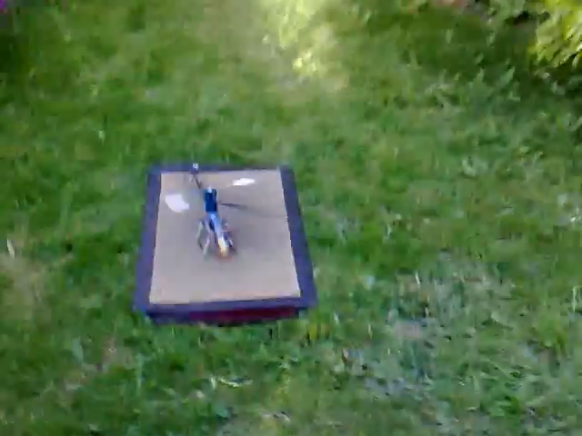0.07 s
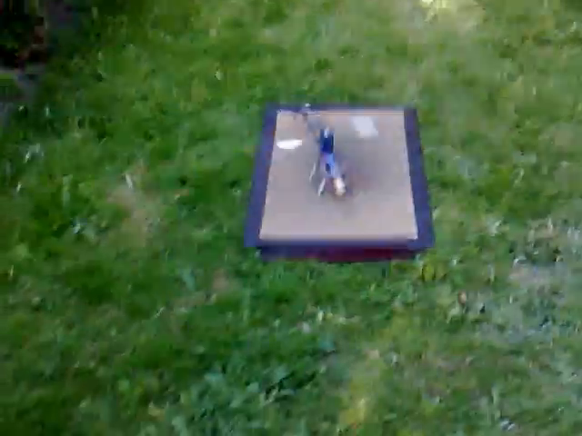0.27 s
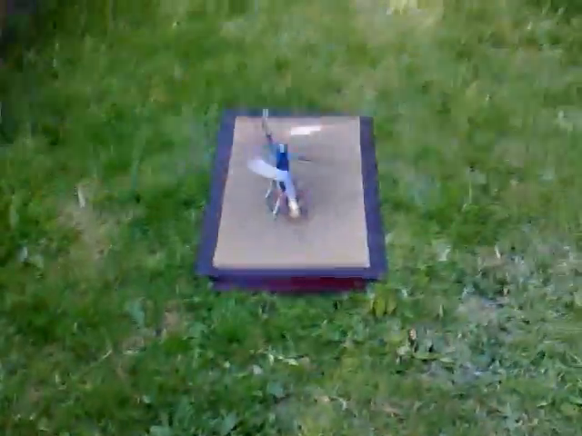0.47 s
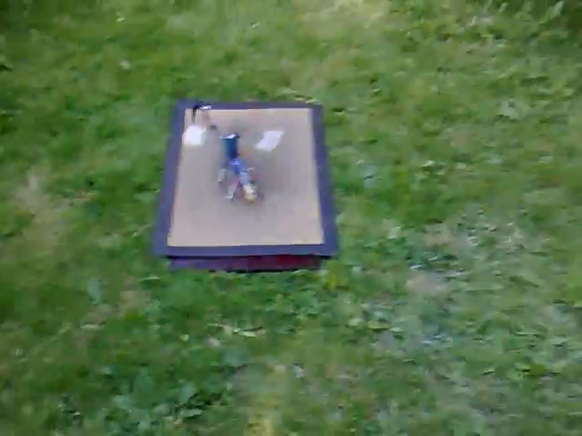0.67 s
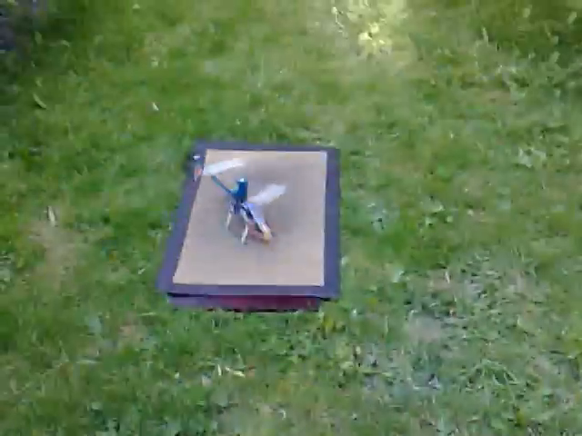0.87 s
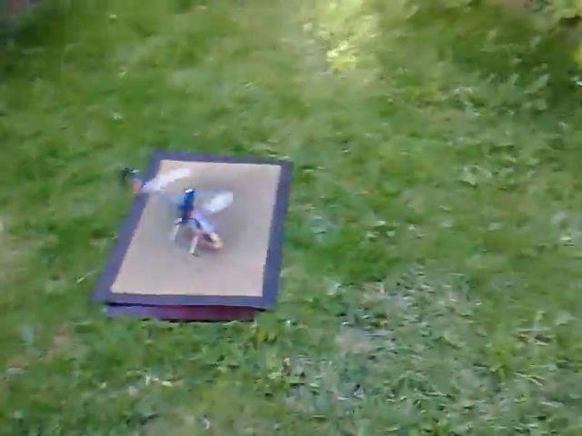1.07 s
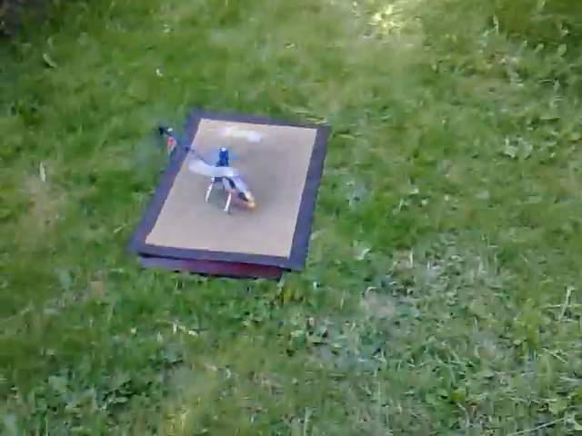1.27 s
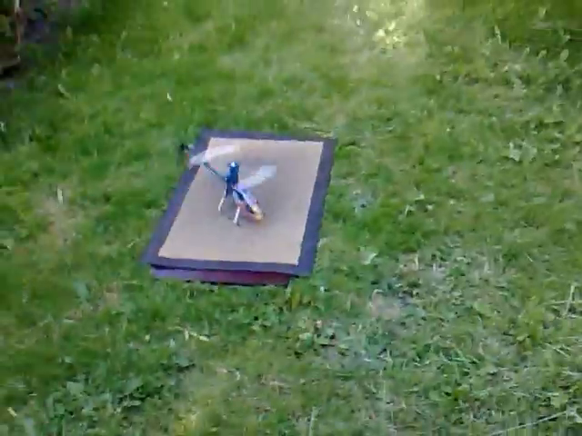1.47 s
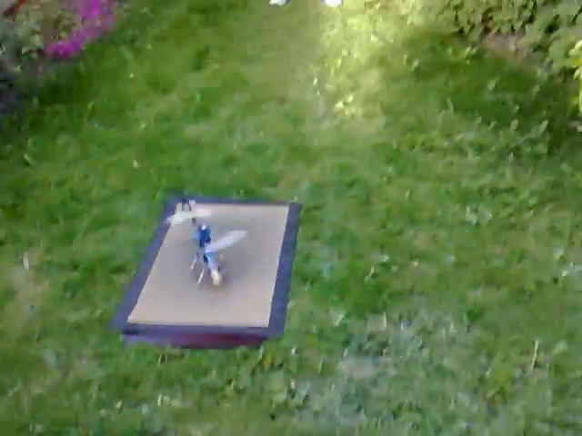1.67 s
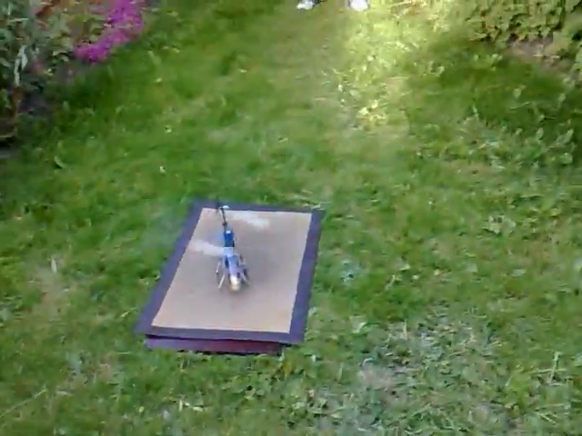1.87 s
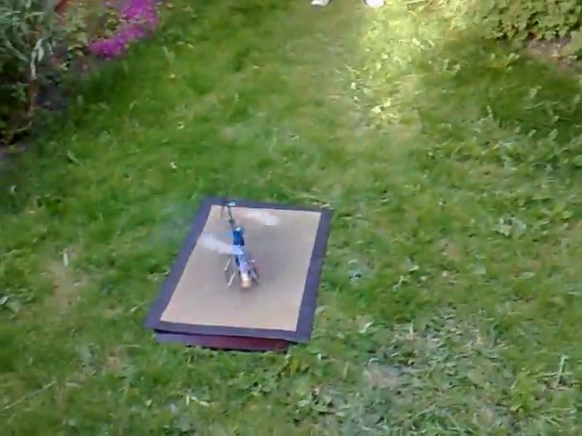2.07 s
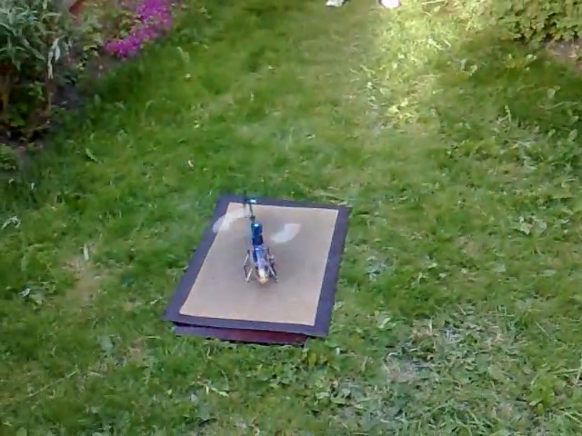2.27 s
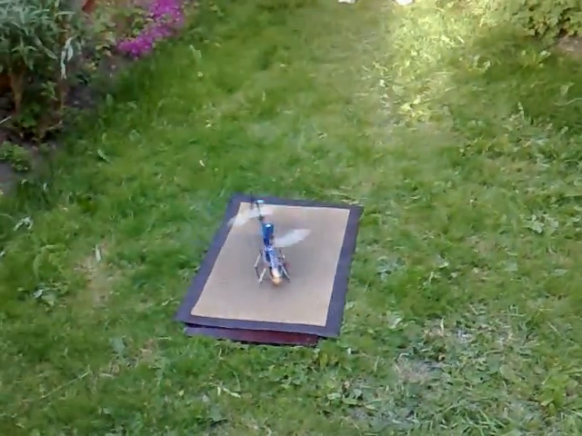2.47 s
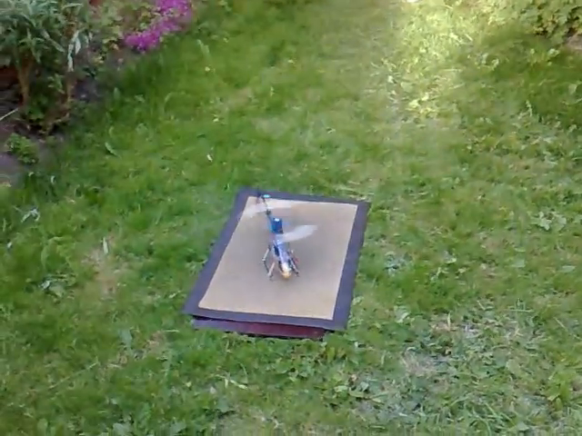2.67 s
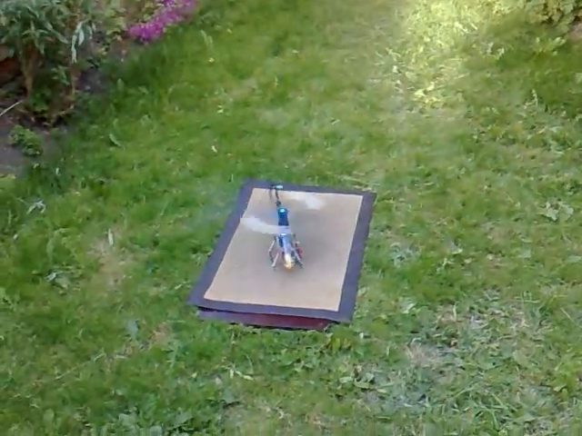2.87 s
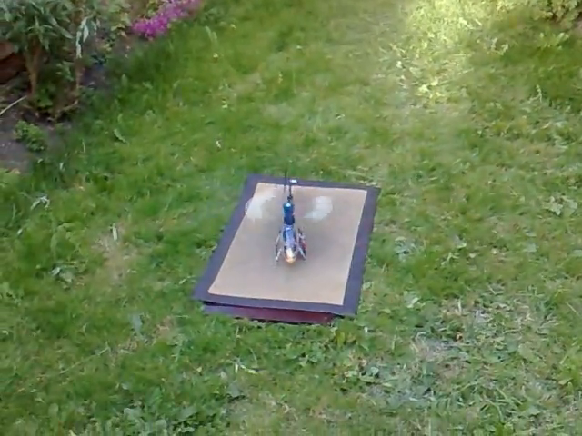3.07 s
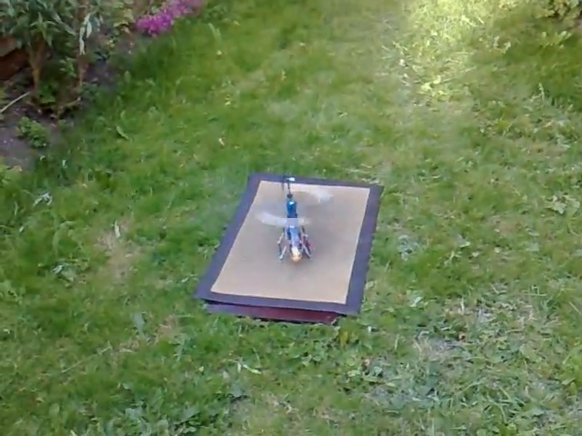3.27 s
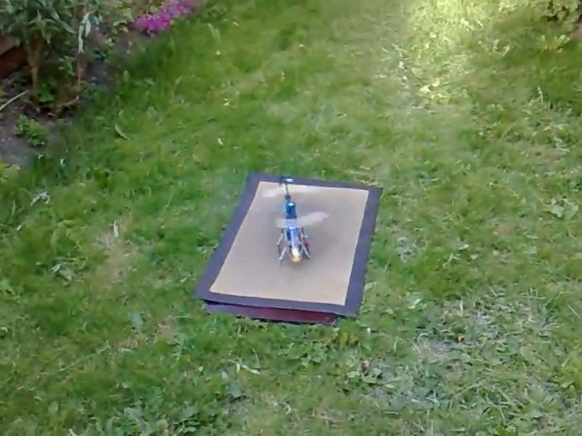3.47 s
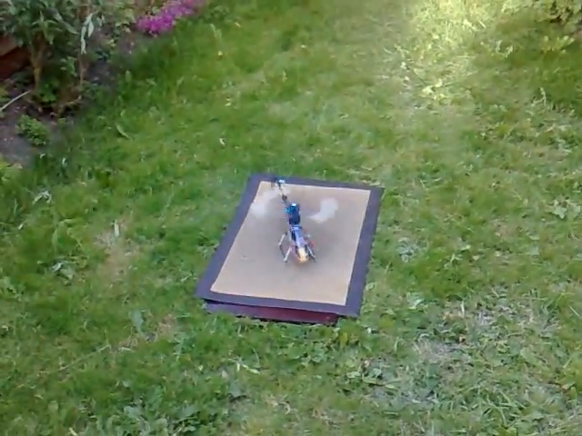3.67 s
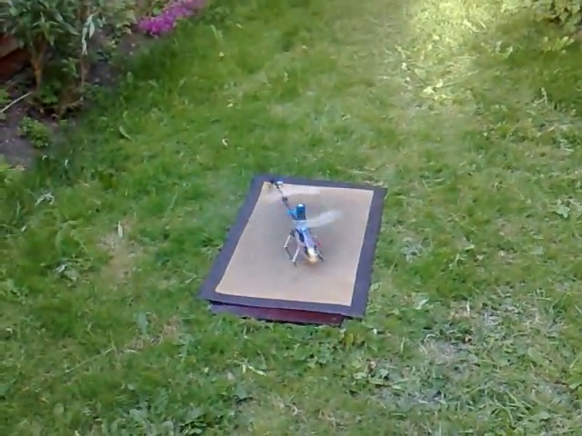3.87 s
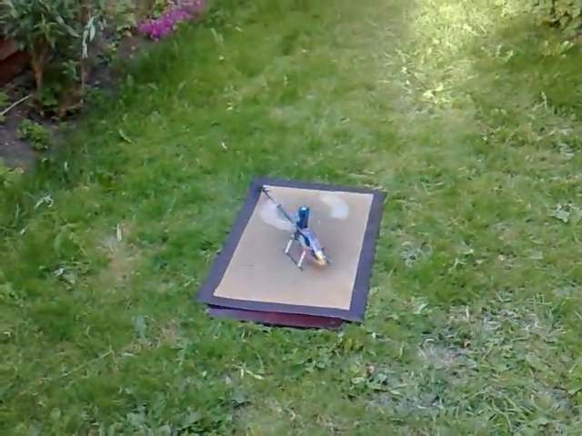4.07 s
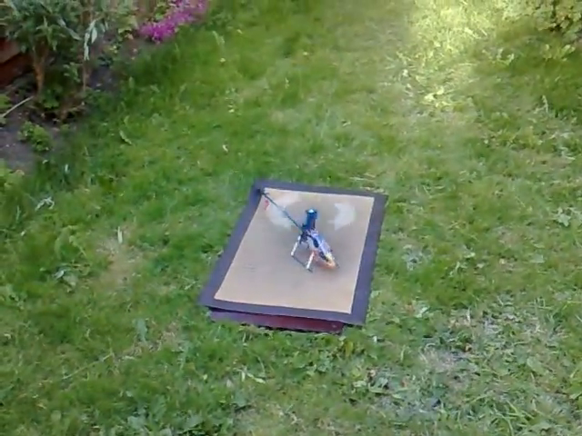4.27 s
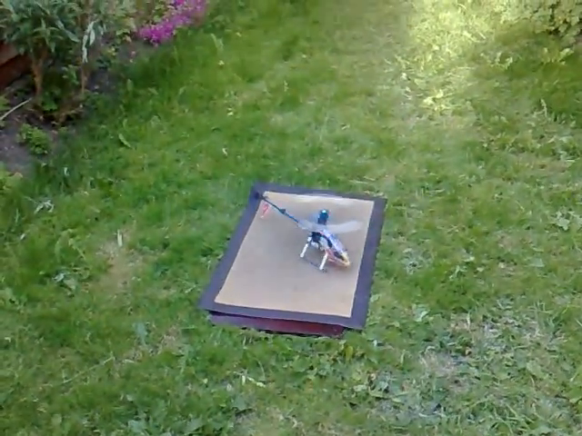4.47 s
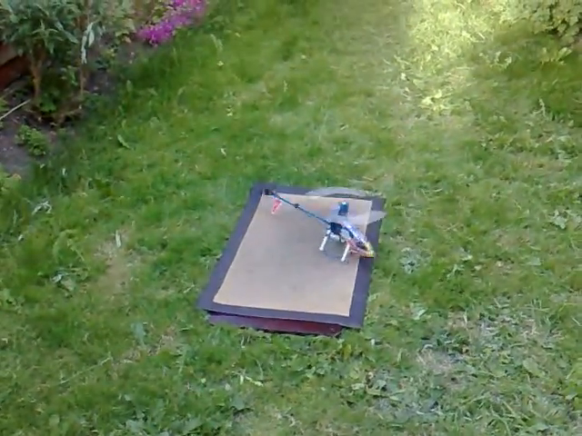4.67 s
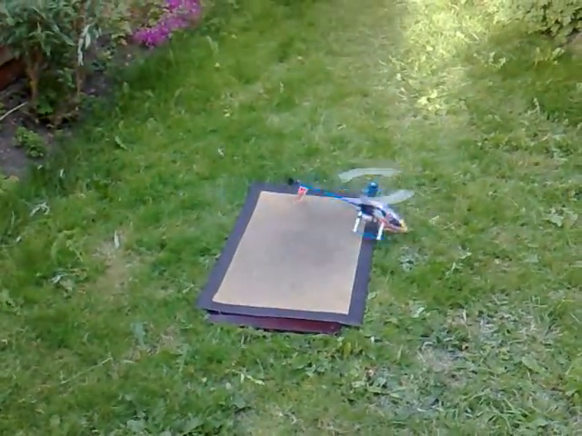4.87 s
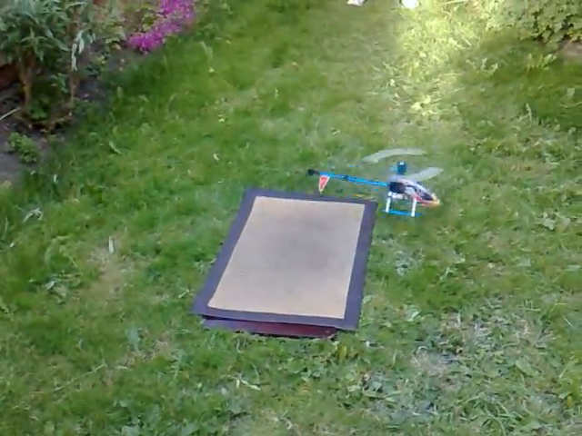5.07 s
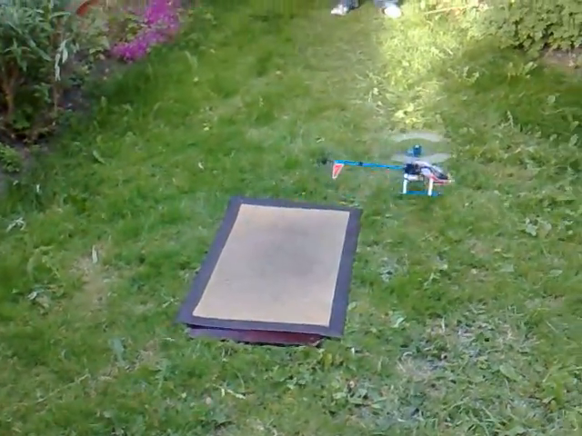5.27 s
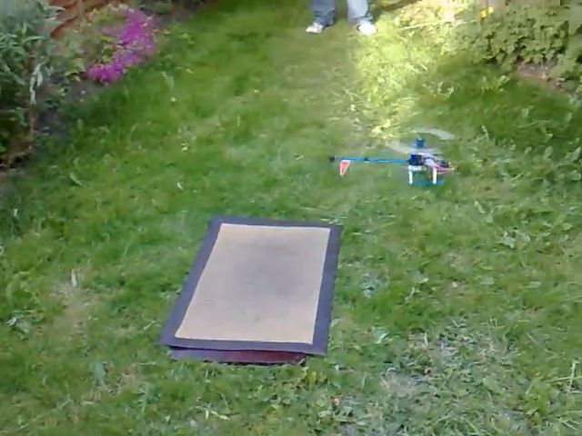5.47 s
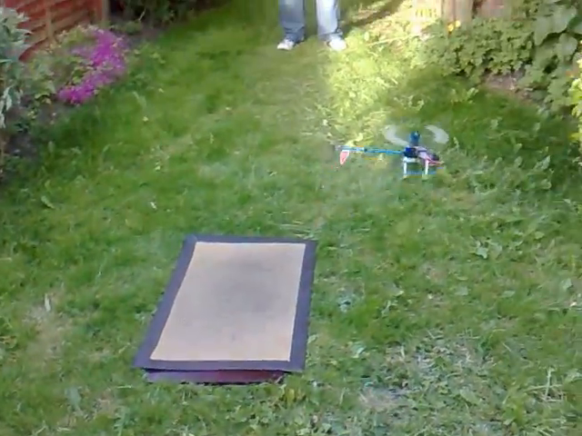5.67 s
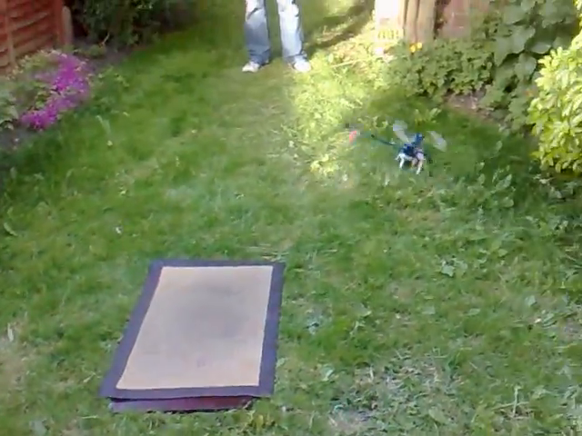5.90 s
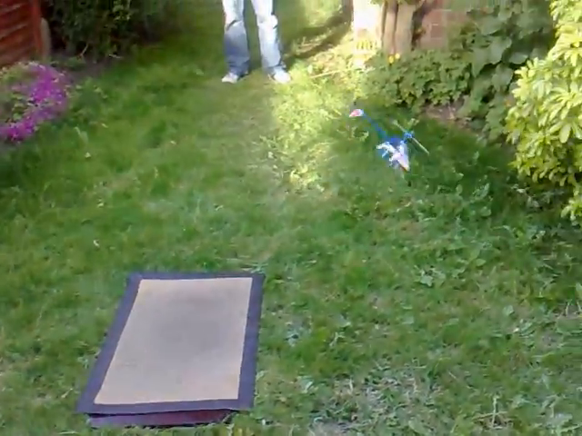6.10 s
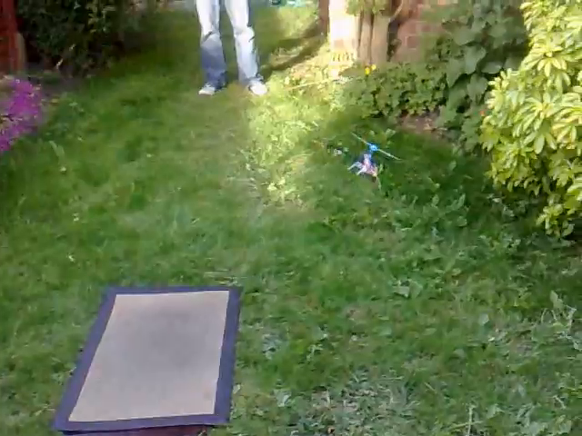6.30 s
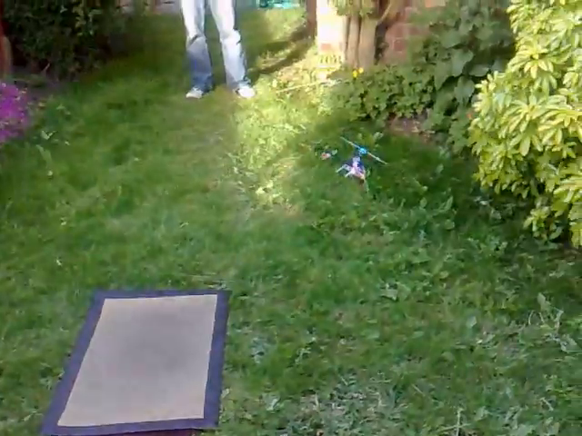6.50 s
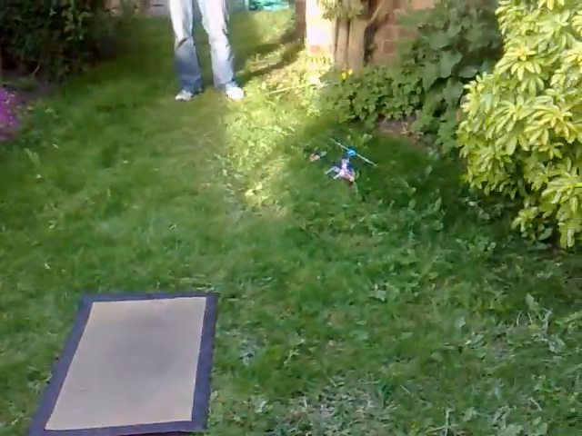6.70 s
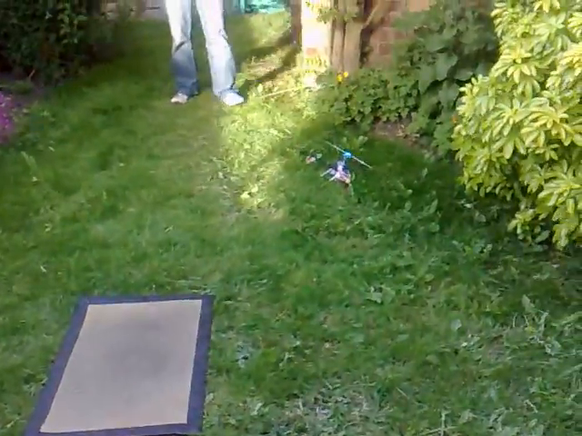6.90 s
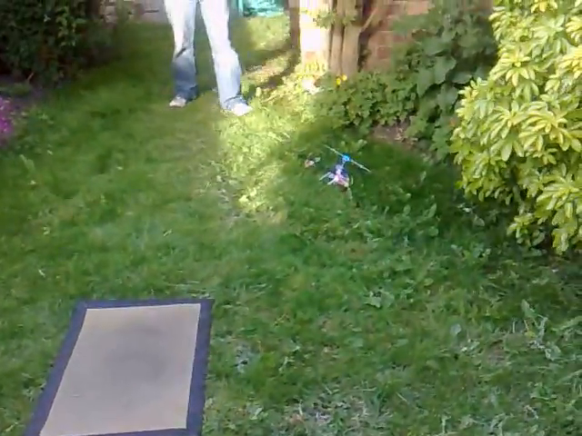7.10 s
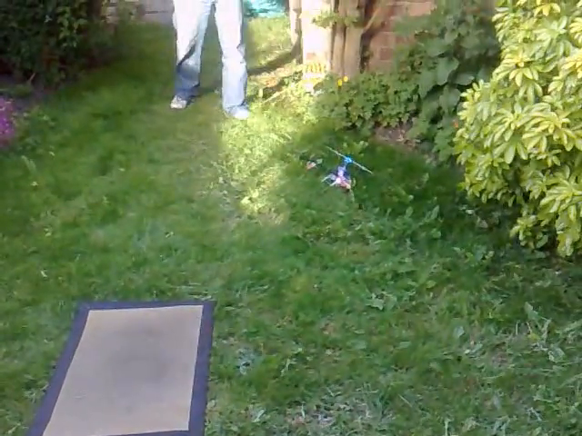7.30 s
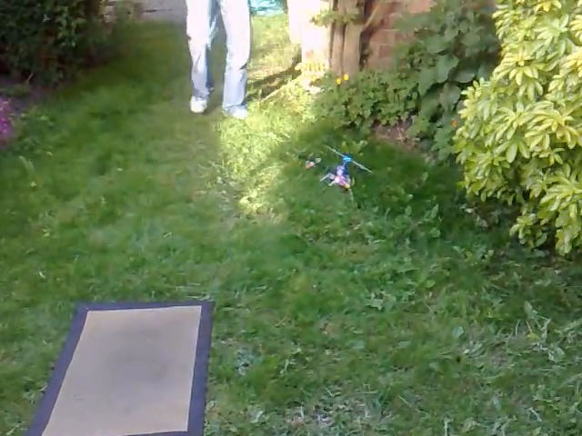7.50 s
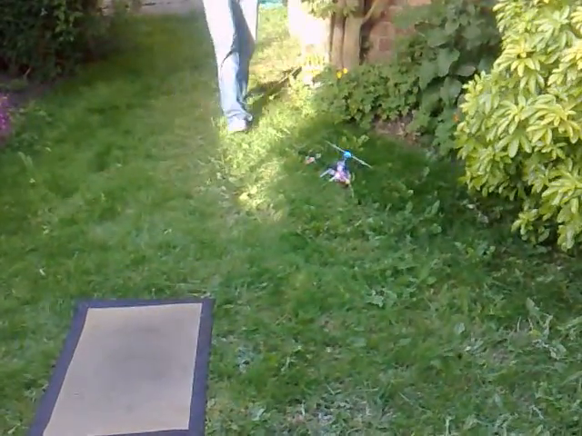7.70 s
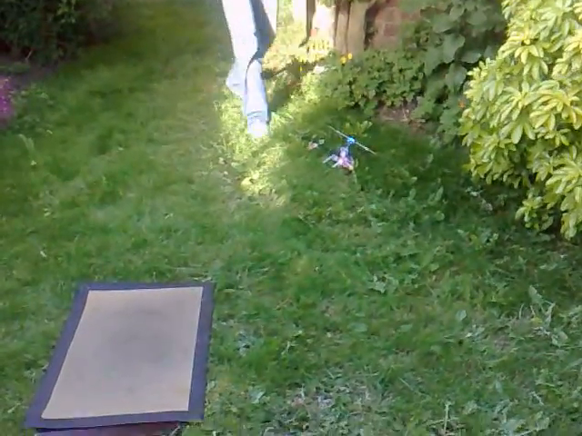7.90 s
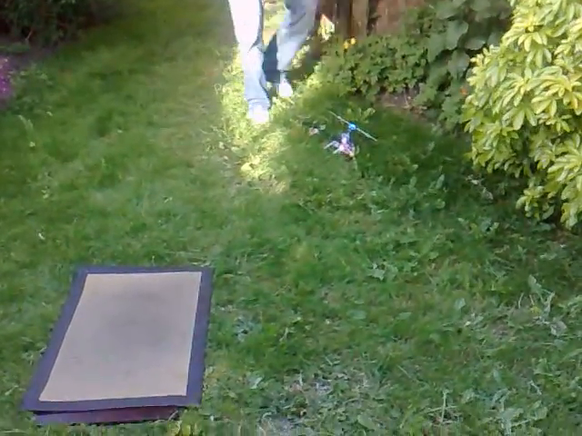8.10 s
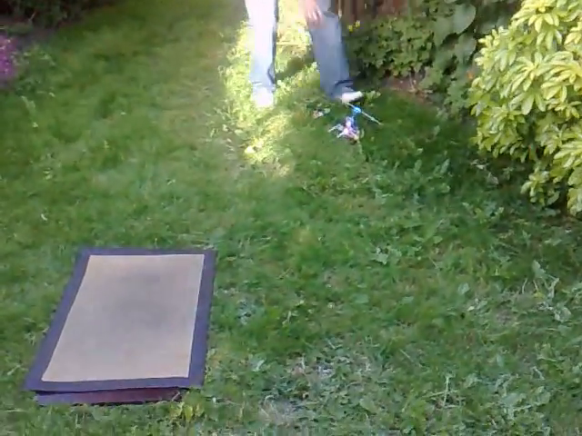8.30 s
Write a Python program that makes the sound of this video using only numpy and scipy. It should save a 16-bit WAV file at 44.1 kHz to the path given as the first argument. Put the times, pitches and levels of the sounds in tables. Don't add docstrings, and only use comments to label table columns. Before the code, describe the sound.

In a garden, a small electric helicopter spins up on a mat, its thin gear whine climbing over airy blade wash and hiss. Skids buzz, the hand-held microphone ticks and wind thumps it heavily. The pitch rises again at lift-off and moves away slightly; then the blades rattle through grass in a burst of sharp cracks and stop. Faint traffic, leaves and footsteps remain.

```python
import sys
import numpy as np
from scipy import signal
from scipy.fft import irfft, next_fast_len
from scipy.io import wavfile
from scipy.ndimage import uniform_filter1d

SR = 44100
rng = np.random.default_rng(int(sys.argv[2]) if len(sys.argv) > 2 else 0)


def rack_gain(trim_db):
    fader = np.asarray(trim_db, float)
    return 10 ** (fader / 20)


def dump_mix(stems):
    frames = np.atleast_2d(stems).T
    limited = np.clip(frames, -1, 1)
    pcm = np.round(limited * 32767).astype(np.int16)
    wavfile.write(sys.argv[1], SR, pcm)


N = 368097


def evened(x):
    return x / np.sqrt(np.mean(x ** 2) + 1e-20)


def read(shape, hz):
    f, db = np.transpose(shape)
    return np.interp(np.log(hz + 1), np.log(f), db, left=-80, right=-80)


def curves(rows):
    s, *columns = np.vstack(rows).T
    t = np.arange(N) / SR
    gate = np.interp(t, [s[0] - .02, s[0], s[-1], s[-1] + .02], [0, 1, 1, 0])
    return [gate] + [np.interp(t, s, c) for c in columns]


def bursts(rows, rise_db, fall_db):
    t = np.arange(N) / SR
    power = 0
    for s, length, db in rows:
        early_s, late_s = np.maximum(s - t, 0), np.maximum(t - s - length, 0)
        power = power + rack_gain(db - rise_db * early_s - fall_db * late_s) ** 2
    return np.sqrt(power)


def add(mix, s, sound):
    part = mix[round(s * SR):][:len(sound)]
    part += sound[:len(part)]


def resonate(x, hz, width):
    turn = np.exp(2j * np.pi * np.cumsum(hz * np.ones(len(x))) / SR)
    r = np.exp(-np.pi * width / SR)
    return 2 * (turn * signal.lfilter([(1 - r) ** 2], [1, -2 * r, r * r], x / turn)).real


def drift(hz):
    size = next_fast_len(N, True)
    f = np.fft.rfftfreq(size, 1 / SR)
    spectrum = rng.standard_normal((len(f), 2)) @ [1, 1j] / (1 + (f / hz) ** 4)
    return evened(irfft(spectrum, size)[:N])


def noise(shape, patchy_db, grain_db=0., size=512):
    x = rng.standard_normal(N) * rack_gain(grain_db * drift(1200))
    hz, t, z = signal.stft(x, SR, nperseg=size, noverlap=size * 3 // 4)
    patches = uniform_filter1d(rng.standard_normal(z.shape), size=8, axis=0)
    patches = evened(uniform_filter1d(patches, size=20, axis=1))
    z = z * rack_gain(read(shape, hz)[:, None] + patchy_db * patches)
    return evened(signal.istft(z, nperseg=size, noverlap=size * 3 // 4)[1][:N])


def throb(turns, depth):
    return 1 + np.clip(depth, 0, 1) * np.cos(2 * np.pi * turns)


def clicks(rows, t60, port_t60, crack=0.39, width=2470):
    port_hz, port_width_hz = 12500, 4900
    out, t = np.zeros(N), np.arange(1500) / SR
    for (s, db, hz, port_db), burst in zip(rows, rng.standard_normal((len(rows), len(t)))):
        puff = burst * rack_gain(-60 * t / t60)
        body = resonate(puff, hz, width) + crack * (0.15 * puff + 1.9 * (t == 0))
        port = resonate(burst * rack_gain(-60 * t / port_t60), port_hz, port_width_hz)
        click = body / abs(body).max() + rack_gain(port_db) * port / abs(port).max()
        add(out, s, rack_gain(db) * click / abs(click).max())
    return out


def gear_whine(mesh_hz, octaves, turns):
    # (frequency [Hz], level [dB])
    mesh_body = [(900, -49), (1500, -45.5), (2050, -53.5), (2400, -45.5), (3300, -44), (3600, -36),
                 (3720, -27.5), (4300, -29.5)]
    twice_body = [(1200, -46), (2050, -48), (2400, -67), (4000, -60), (4700, -50), (6200, -49), (7300, -59),
                  (8600, -58)]
    # (start [s], length [s], level [dB])
    bites = [(.13, .2, -46.5), (.42, 0.15, -46), (.81, 0.077, -45), (1.07, .2, -44), (1.72, 0.11, -44),
             (2.55, 0.16, -46), (2.8, 0.049, -44), (3.02, 0.19, -44), (3.4, .1, -47), (3.93, 0.1, -30.5),
             (4.24, 0.045, -27), (5.72, 0.16, -34.5)]
    shaft_orders = (5, 6, 7, 11, 13, 15, 30)
    shaft_levels = (-55.5, -57.5, -50.5, -75, -67.5, -73, -73)
    # (start [s], length [s], level [dB])
    sings = [
        [(.9, 0.11, -50), (2.67, 0.2, -38), (2.95, 0.42, -46.5), (4.25, 0.15, -44), (5.05, 0.19, -46),
         (5.4, 0.35, -48.5)],
        [(.8, 0.24, -51), (1.5, 0.23, -42.5), (4.4, 0.29, -48)],
        [(.79, 0.04, -52), (1.0, 0.03, -48), (2.52, 0.37, -46.5), (5.05, 0.16, -53), (5.5, 0.28, -50)],
        [(5.4, 0.66, -49)],
        [(4.45, 0.2, -52)],
        [(2.716, .06, -53)],
        [(.88, .2, -56)],
    ]
    # (multiple of mesh [1], level to mesh line [dB])
    side_lines = [(.3, -18), (.4, -17), (0.799, -17.5), (.9, -11.5), (0.941, -9.5), (1.057, -9.5),
                  (1.099, -11), (1.3, -16.5), (1.2, -19), (1.4, -19), (1.501, -24), (1.6, -19.5)]
    # (multiple of mesh [1], level to twice the mesh [dB])
    twice_sides = [(1.9, -12.5), (1.942, -3), (2.1, -5.5), (2.95, -8.5), (3.058, -9)]
    # (multiple of mesh [1], level to the line [dB], width [Hz])
    skirts = [(1, -5, 180), (2, -1.5, 240)]
    away_s, away_db_per_s = 4.95, 14.5
    shaft_db_per_octave, sing_db_per_s = 7.5, 122.5
    twice_sides_db_per_octave = 30
    pinion_teeth, main_teeth = 10, 140
    mesh_turn = .62

    t, rotor = np.arange(N) / SR, turns / main_teeth
    mesh_db = read(mesh_body, mesh_hz) - away_db_per_s * np.clip(t - away_s, 0, .6)
    twice = rack_gain(read(twice_body, 2 * mesh_hz))
    lines = [(1, np.hypot(rack_gain(mesh_db), bursts(bites, 170, 121))), (2, twice)]
    for k, db, rows in zip(shaft_orders, shaft_levels, sings):
        steady = rack_gain(db + shaft_db_per_octave * octaves)
        sing = bursts(rows, 2 * sing_db_per_s, sing_db_per_s)
        lines.append((k / pinion_teeth, np.hypot(steady, sing)))
    for k, db in side_lines:
        lines.append((k, rack_gain(np.minimum(mesh_db, -35) + db)))
    slow_db = twice_sides_db_per_octave * np.minimum(octaves + 0.18, 0)
    for k, db in twice_sides:
        lines.append((k, twice * rack_gain(db + slow_db)))

    slack = np.clip(.95 - mesh_hz / 4200, .15, .45)
    whine = np.zeros(N)
    for k, gain in lines:
        start_turn = mesh_turn if k == 1 else rng.random()
        flutter_db = 1.2 + 6 * slack - 1.0 * (k == 1)
        beat = throb(rotor + start_turn, slack) * rack_gain(flutter_db * drift(30))
        wander = (.057 * k + .2 * slack * (k != 1)) * drift(70)
        whine += gain * beat * np.sqrt(2) * np.cos(2 * np.pi * (k * turns + wander))
    for (k, db, width), (_, gain) in zip(skirts, lines):
        skirt = evened(resonate(rng.standard_normal(N), k * mesh_hz, width))
        whine += np.minimum(gain, rack_gain(-38)) * rack_gain(db) * skirt
    return whine


def loose_canopy(rotor):
    # (start [s], length [s], level [dB])
    shakes = [(.5, 0.065, -39.5), (.7, .03, -42), (.8, 0.16, -39), (1.0, .25, -43)]
    # (frequency [Hz], width [Hz], level [dB])
    shudder = [(1102, 72, -2), (1312, 74, 5), (1445, 41, 6.5), (1633, 66, 3.5)]
    # (start [s], length [s], level [dB])
    hums = [
        [(2.58, .02, -48), (2.7, 0.1, -47), (2.88, .04, -49), (3.9, .4, -43)],
        [(.05, .1, -55), (.24, 0.092, -56), (.45, .1, -56), (1.03, .03, -52), (1.25, 0.12, -43)],
        [(.76, .03, -55), (.87, .02, -44.5), (.94, .02, -48), (.995, .01, -49), (1.025, .01, -50)],
    ]
    # (frequency [Hz], width [Hz])
    hum_modes = [(4590, 150), (3800, 130), (3010, 300)]
    jolt_turn = 0.11
    jolts = rng.standard_normal(N) * throb(rotor + jolt_turn + .08 * drift(8), .3) ** 2
    shaking = evened(sum(rack_gain(db) * resonate(jolts, hz, width) for hz, width, db in shudder))
    out = bursts(shakes, 100, 95) * shaking
    for rows, (hz, width) in zip(hums, hum_modes):
        out += bursts(rows, 200, 150) * evened(resonate(jolts, hz, width))
    return out


def frame_rattle(rotor):
    # (frequency [Hz], width [Hz], level [dB])
    frame = [(1139, 130, -0.5), (1361, 72, 5), (1458, 98, 3.5), (1622, 200, 2.5)]
    lift_s, loose_db_per_s = 4.8, 25
    knocks = rng.standard_normal(N) * throb(2 * rotor + 0.37 * drift(8.3), 0.29) * rack_gain(2.6 * drift(34.16))
    rattle = evened(sum(rack_gain(db) * resonate(knocks, hz, width) for hz, width, db in frame))
    return rack_gain(-loose_db_per_s * np.maximum(np.arange(N) / SR - lift_s, 0)) * rattle


def blade_wash(low_db, high_db):
    # (frequency [Hz], level per Hz [dB])
    wash_low = [(120, -30), (200, -0.5), (580, -6.5), (892, 2.5), (1370, -2.5), (2000, 4), (3340, -3),
                (4030, -9), (5000, -9.5), (6500, -49), (11000, -120)]
    wash_high = [(2060, -21), (3500, 3.5), (4560, 0.5), (5360, -4.5), (6400, -6), (8530, -10),
                 (11000, -3.5), (14300, -46), (22000, -120)]
    return rack_gain(low_db) * noise(wash_low, 0.91) + rack_gain(high_db) * noise(wash_high, 1.56, 1.4)


def tip_hiss(mesh_hz, smear_db):
    # (frequency [Hz], level per Hz [dB])
    port_colour = [(3530, -13), (6000, -8), (7670, -18.5), (8690, -14), (10400, -7.5), (12200, 4),
                   (12800, 8), (14300, 4.5), (15700, -4.5)]
    # (multiple of mesh [1], level [dB], width [Hz])
    smears = [(3, -9, 640), (3.5, -23, 1300), (4, -1.5, 1100), (5, -15, 11000), (6, -21.5, 8000)]
    lift_hz, fade_hz = 11300, 14000
    air = rng.standard_normal(N) * rack_gain(0.64 * drift(900))
    smear = np.zeros(N)
    for k, db, width in smears:
        band_hz = k * mesh_hz
        sunk_db = abs(band_hz - np.clip(band_hz, lift_hz, fade_hz)) / 150
        band = evened(resonate(air, band_hz, width))
        smear += rack_gain(db + 0.85 * read(port_colour, band_hz) - sunk_db) * band
    return noise(port_colour, 0.93, 1.6) + rack_gain(smear_db) * smear


def helicopter():
    # (time [s], gear mesh [Hz])
    speed = [(0, 640), (.3, 1326), (.5, 1598), (.77, 1855), (1.0, 2268), (1.2, 2412), (1.45, 2680),
             (2.05, 2858), (2.47, 2862), (2.85, 3155), (3.15, 3164), (3.35, 3275), (4.15, 3570),
             (4.8, 4088), (5.2, 4058), (5.45, 4132), (5.9, 4145), (6.1, 4050)]
    # (time [s], change of mesh [Hz], width [s])
    surges = [(2.88, 35, .05), (3.33, 45, .1), (3.62, -30, .1), (3.98, -25, .09), (4.83, 15, .05),
              (.76, -35, .05), (.9, -40, .05), (6.1, -60, .05)]
    # (time [s], blade load [dB], tooth chatter [dB])
    load = [(0, -58, 5), (.36, -44, -4), (.56, -47, 20), (.93, -39.5, 16), (1.07, -35, 4),
            (1.35, -30.5, -8), (1.7, -31.5, -19), (2.0, -34.5, -4), (2.62, -33.5, -8), (2.85, -29.5, -8),
            (3.51, -28.5, -3), (4.25, -25, -29), (4.49, -27.5, 1), (5.93, -29.5, 0), (6.1, -25, -9)]
    full_db, full_hz = -30, 3200
    pinion_teeth, main_teeth, tail_ratio = 10, 140, .058
    gate, mesh_hz = curves(speed)
    on, tip_db, smear_db = curves(load)
    t, octaves = np.arange(N) / SR, np.log2(mesh_hz / full_hz)
    mesh_hz = mesh_hz + sum(hz * np.exp(-((t - s) / width) ** 2) for s, hz, width in surges)
    turns = np.cumsum(mesh_hz * (1 + 0.002016 * drift(43.5))) / SR
    rotor, tail, shaft = turns / main_teeth, turns * tail_ratio, turns / pinion_teeth

    load_db = tip_db - full_db
    low_db = -37 + 0.59 * load_db + 1.65 * octaves
    high_db = -37.5 + 0.65 * load_db + 0.78 * octaves
    rattle_db = -42.5 + 0.36 * load_db + .1 * octaves

    whine = gear_whine(mesh_hz, octaves, turns) + loose_canopy(rotor)
    swish = throb(2 * rotor, 0.064) * throb(tail, 0.014)
    wash = swish * (blade_wash(low_db, high_db) + rack_gain(rattle_db) * frame_rattle(rotor))
    tips = rack_gain(tip_db) * tip_hiss(mesh_hz, smear_db) * throb(tail, 0.11) * throb(shaft, 0.1)
    tips = tips * throb(rotor, 0.067) * rack_gain(1.1 * drift(2.7) + 0.76 * drift(7.1))
    return gate * whine + on * (wash + tips)


def garden():
    # (frequency [Hz], level per Hz [dB])
    traffic = [(11, -57), (18, -18), (81, -14.5), (108, -23), (255, -21), (358, -26), (430, -28.5),
               (529, -27.5), (1750, -28.5), (9000, -60.5), (11700, -89.5), (19800, -120)]
    hiss = [(2940, -32), (5000, -2.5), (7370, -2), (7770, -2.5), (8630, -3.5), (15700, -3.5)]
    leaves = [(2350, -8), (4000, 0.5), (5050, -7), (5730, -7), (8060, -8), (10900, -1.5), (12100, -1.5),
              (15600, -6.5)]
    steps = [(500, -14), (900, -5), (1500, 0.5), (2500, 0), (3100, -6.5), (6000, -22)]
    # (start [s], length [s], level [dB])
    breeze = [
        (0, 7.2, -74),
        (7.72, .7, -60),
    ]
    feet = [(0, 0.24, -50), (6.41, 0.021, -60), (7.07, 0.1, -57.5), (7.5, 0.17, -61.5), (7.72, 0.57, -58)]
    # (start [s], length [s], level [dB], first pitch [Hz], last pitch [Hz])
    drone = [(4.603, 0.21, -48, 136, 130), (5.17, 0.53, -52, 146.8, 131), (6.16, 0.37, -54.5, 81.5, 84),
             (6.5, 0.67, -58.5, 80.6, 75), (8.15, .2, -60, 66.7, 70)]
    traffic_db, hiss_db = -52, -71
    out = rack_gain(traffic_db) * noise(traffic, 1.6, size=2048) + rack_gain(hiss_db) * noise(hiss, 0.547)
    out += bursts(breeze, 31, 30) * noise(leaves, 1.6, 1.47)
    out += bursts(feet, 120, 110) * noise(steps, 1.54, 1.4)
    for s, length, db, first_hz, last_hz in drone:
        hz = np.interp(np.arange(N) / SR, [s, s + length], [first_hz, last_hz])
        tone = np.sqrt(2) * np.sin(2 * np.pi * np.cumsum(hz) / SR)
        out += bursts([(s, length, db)], 152, 70) * tone
    return out


def wind():
    # (start [s], length [s], level [dB], sharpness [dB])
    gusts = [(0, 0.31, -38.5, -11), (0.327, 0.24, -28, -20), (0.6, 0.22, -44, -21),
             (0.814, 0.054, -34.5, -17), (0.96, 0.2, -31, -14), (1.18, 0.36, -27.5, -11),
             (1.565, 0.33, -34.5, -5.5), (1.772, 0.079, -28.5, -7.5), (1.908, .14, -31, -16),
             (2.13, 0.12, -23.5, -8), (2.302, 0.05, -16.5, -5), (2.432, 0.2, -29.5, -6),
             (2.72, 0.47, -33, -13.5), (3.086, 0.1, -44, -25), (3.25, 0.22, -37.5, -19),
             (3.547, 0.37, -49.5, -8), (4.048, 0.059, -36, -29), (4.263, 0.28, -39, -25),
             (4.505, 0.24, -42.5, -8), (4.822, 0.056, -28, -2), (4.908, 0.08, -30, -1.5),
             (5.045, 0.064, -35.5, -20), (5.553, 0.45, -67, 8)]
    # (frequency [Hz], level per Hz [dB])
    gust_low = [(15, -5.5), (45, 6), (90, 3), (150, -10.5), (300, -43)]
    gust_high = [(80, -22), (150, 9), (250, -1), (450, -20), (900, -26)]
    # (time [s], peak [dB], pitch [Hz])
    thumps = [(0.332, -21, 172), (0.461, -17, 100), (0.494, -23, 114), (0.514, -20.5, 103),
              (0.538, -29, 192), (0.852, -21, 131), (1.034, -26, 184), (1.119, -23, 143),
              (1.253, -24, 139.4), (1.283, -25, 166), (1.334, -24.5, 194), (1.483, -11, 118),
              (1.498, -19, 109), (1.546, -22.5, 174), (1.568, -26, 116), (1.614, -12, 195),
              (1.656, -12, 252), (1.692, -19, 215), (1.775, -13, 140), (1.798, -19, 170), (1.834, -14, 133),
              (1.874, -23, 199), (2.128, -20, 124), (2.154, -20, 125), (2.169, -14, 135), (2.188, -32, 135),
              (2.209, -11, 167), (2.229, -17, 182), (2.28, -11.5, 107), (2.316, -24, 124),
              (2.341, -4.5, 230), (2.356, -11, 158), (2.385, -29, 94), (2.412, -18, 88), (2.444, -31, 159),
              (2.497, -18.5, 109), (2.569, -18, 139), (2.592, -12.5, 204), (2.732, -16.5, 170),
              (2.762, -7, 185), (2.853, -18, 146), (2.931, -25, 121), (3.004, -17, 152), (3.046, -28, 222),
              (3.121, -19, 118), (4.54, -23, 130), (4.809, -22, 119), (4.825, -18.5, 234),
              (4.846, -13, 182), (4.864, -18, 170), (4.88, -21, 173), (4.923, -22, 173), (4.948, -16, 111),
              (4.965, -18.5, 196), (4.985, -15, 89), (5.009, -22, 114)]
    rise_db_per_s, fall_db_per_s = 1500, 240
    lumps = drift(23.7)
    low = evened(noise(gust_low, 0.07, size=2048) * rack_gain(3.5 * lumps))
    high = evened(noise(gust_high, .1, size=2048) * rack_gain(4.0 * lumps))
    low_rows = [(s, length, db) for s, length, db, _ in gusts]
    high_rows = [(s, length, db + sharp_db) for s, length, db, sharp_db in gusts]
    out = bursts(low_rows, rise_db_per_s, fall_db_per_s) * low
    out += bursts(high_rows, rise_db_per_s, fall_db_per_s) * high
    for (s, peak_db, hz), phase in zip(thumps, rng.random(len(thumps))):
        u = np.arange(round(1.6 * SR / hz)) * hz / SR
        swell = np.hanning(len(u))
        blow = np.cos(2 * np.pi * (u + phase)) + 0.24 * swell ** 4 * np.cos(2 * np.pi * 2.1 * u)
        add(out, s - .002, rack_gain(peak_db - 1.5) * swell * blow)
    return out


def case_ticks():
    # (time [s], peak [dB], pitch [Hz], port ring to it [dB])
    ticks = [(0.0054, -27, 3300, -27), (0.0322, -13, 4930, -37), (0.0384, -24, 3830, -6),
             (0.0864, -43, 3900, 2), (0.1258, -20.5, 2800, -4), (0.154, -12, 6100, -30),
             (0.2500, -26, 6600, 6), (0.3215, -24.5, 6640, 7), (1.1192, -9.5, 8500, -14),
             (1.1192, -7.5, 3340, -20), (1.1193, -14, 5800, -20)]
    return clicks(ticks, 0.011, 0.014, crack=0.52)


def skids():
    # (start [s], length [s], level [dB])
    buzz = [
        [(0.31, .03, -51), (0.42, 0.31, -52), (.88, .1, -48)],
        [(1.24, 0.04, -37), (1.3, 0.24, -41.5)],
        [(1.5, .06, -49), (1.63, 0.13, -33)],
    ]
    # (frequency [Hz], width [Hz], decay from tap to tap [dB])
    buzz_rings = [(6600, 1200, 5), (10300, 2600, 26), (13200, 3500, 22)]
    # (time [s], peak [dB], pitch [Hz], port ring to it [dB])
    taps = [(1.1444, -25, 12300, -7), (1.1764, -22, 12800, -8), (1.2114, -20, 13400, -8),
            (1.2456, -18, 11200, -8), (1.2564, -17, 11200, -8), (1.2665, -13.5, 11100, -10),
            (1.2764, -22, 11200, -8), (1.2864, -21, 12000, -8), (1.2994, -23, 11600, -8),
            (1.3104, -20, 9850, -8), (1.3224, -20, 12900, -8), (1.3344, -18, 11300, -8),
            (1.3444, -21, 12600, -8), (1.3664, -21, 10500, -8), (1.3788, -26, 10800, -8),
            (1.3788, -16, 11000, -8), (1.4014, -22, 13100, -8), (1.4124, -22, 11500, -8),
            (1.4224, -22, 13300, -8), (1.4444, -20, 11000, -8), (1.4564, -21, 13300, -8),
            (1.4784, -21, 13200, -8), (1.499, -19, 13200, -8), (1.5224, -19, 13100, -8),
            (1.5434, -17, 11600, -8), (1.5594, -21, 12600, -8), (1.6317, -18, 13200, -8),
            (1.6487, -16, 13200, -8), (1.6806, -14, 13300, -8), (1.6974, -16, 12100, -8),
            (1.7114, -19, 12800, -8)]
    buzz_hz, taps_db, tap_t60_s = 90, -3.5, .012
    turns = np.cumsum(buzz_hz * (1 + 0.25 * drift(36))) / SR
    size_db = 2.0 * rng.standard_normal(N)[turns.astype(int)]
    air = rng.standard_normal(N) * rack_gain(size_db)
    out = rack_gain(taps_db) * clicks(taps, tap_t60_s, tap_t60_s, crack=0., width=1600)
    for rows, (hz, width, fade_db) in zip(buzz, buzz_rings):
        ring = evened(resonate(air * rack_gain(-fade_db * (turns % 1)), hz, width))
        out += bursts(rows, 120, 200) * ring
    return out


def soft_knocks():
    # (time [s], peak [dB], pitch [Hz], port ring to it [dB])
    knocks = [
        (5.5807, -19.5, 2200, -60),
        (5.5807, -20.5, 790, -60),
        (7.233, -51, 3200, -60),
        (7.239, -41, 500, -59),
    ]
    return clicks(knocks, .012, .01, crack=0., width=1500)


def crash():
    # (start [s], length [s], level [dB])
    downwash = [(5.6, 0.43, -46.5)]
    # (time [s], level [dB])
    thrash = [(6.04, -48), (6.07, -26.5), (6.115, -21.5), (6.145, -18), (6.195, -23), (6.245, -28),
              (6.295, -40.5), (6.35, -63)]
    # (start [s], length [s], level [dB])
    last_flick = [(6.365, 0.016, -49)]
    thuds = [(6.075, 0.18, -30.5)]
    tip_over = [(6.3, 0.026, -48), (6.37, .01, -53), (6.395, 0.03, -45.5), (6.445, 0.0088, -55)]
    # (frequency [Hz], level per Hz [dB])
    shred_colour = [(2940, -33), (5000, -14.5), (5770, -17), (6560, -18.5), (7280, -16), (8050, -16),
                    (13000, -3.5), (15600, -11.5)]
    thud_colour = [(88, -41), (150, 3), (292, 1.5), (597, -8.5), (792, 5), (1390, 1), (1820, 2.5),
                   (3660, 0), (4780, -10), (8000, -26.5), (10400, -41), (17600, -120)]
    settle_colour = [(300, -19), (900, 6.5), (1300, -2), (2200, -1), (3200, -11), (4600, -8), (5500, -22),
                     (9000, -35.5)]
    # (time [s], peak [dB], pitch [Hz], port ring to it [dB])
    strikes = [(5.9764, -15, 8500, -3), (6.0656, -15, 5500, 3), (6.0724, -13, 8500, 3),
               (6.0782, -7.5, 2400, 8), (6.0855, -17.5, 8000, 2.5), (6.096, -2.5, 8500, 10),
               (6.103, -11, 8140, -6.5), (6.1112, -2.5, 12500, 9), (6.1112, -7, 4000, -20),
               (6.1176, -16.5, 7500, 6), (6.1218, -8.5, 3640, -0.5), (6.1297, -5, 3500, -3),
               (6.1332, -7, 12800, -0.5), (6.1407, -11, 8500, 8), (6.148, -9.5, 4950, -4),
               (6.1545, -9.5, 8840, 5), (6.1598, -11.5, 2200, 3), (6.172, -16.5, 9500, 9),
               (6.1771, -20, 8500, 2.5), (6.1908, -3.5, 2600, 1.5), (6.2018, -11, 2280, -0.5),
               (6.208, -14, 4000, 0), (6.2214, -28, 4000, 5), (6.2446, -16.5, 2500, 6),
               (6.3683, -41, 8000, 4)]
    out = bursts(downwash, 32, 200) * evened(resonate(rng.standard_normal(N), 327, 380))
    gate, db = curves(thrash)
    shred_gain = gate * rack_gain(db) + bursts(last_flick, 1500, 370)
    out += shred_gain * noise(shred_colour, 1.5, 1.3, size=256)
    out += bursts(thuds, 650, 224) * noise(thud_colour, 1.7, 3.0, size=256)
    out += bursts(tip_over, 400, 250) * noise(settle_colour, 2.5, 3.0, size=256)
    return out + clicks(strikes, t60=.006, port_t60=.008)


def scene():
    mono = helicopter() + garden() + wind() + case_ticks() + skids() + soft_knocks() + crash()
    return np.array([mono, mono])


def band_limit(x):
    return signal.sosfilt(signal.butter(12, 16490, fs=SR, output="sos"), x)


def record(dry):
    # (middle [s], level to the treble [dB])
    slips = [(.209, -20), (2.926, -12), (3.32, -9), (3.715, -13), (7.802, -12)]
    slip_s, treble_hz, edge_hz = 1024 / SR, 4500, 15720
    bright = signal.sosfilt(signal.butter(8, treble_hz, "high", fs=SR, output="sos"), dry[0])
    t = np.arange(N) / SR
    side = np.zeros(N)
    for s, db in slips:
        side += rack_gain(db) * np.cos(np.pi / 2 * np.clip((t - s) / slip_s, -1, 1)) * bright
    edge = signal.firwin(1023, edge_hz, window=("kaiser", 9), fs=SR)
    mix = signal.oaconvolve(dry + np.array([side, -side]), edge[None], "same")
    return band_limit(mix)


dry = scene()
out = record(dry)
dump_mix(out)
```